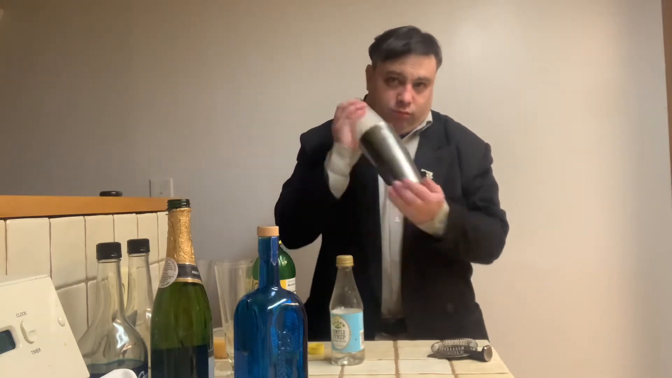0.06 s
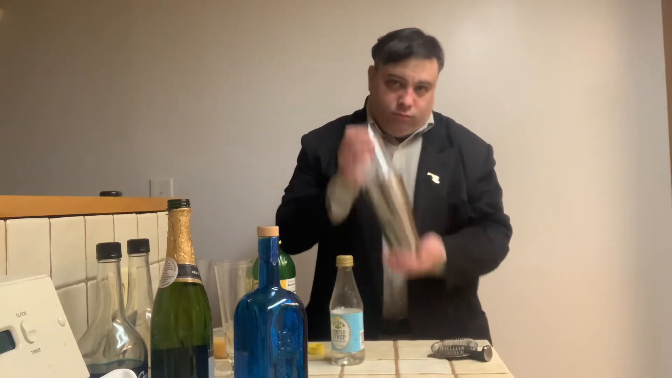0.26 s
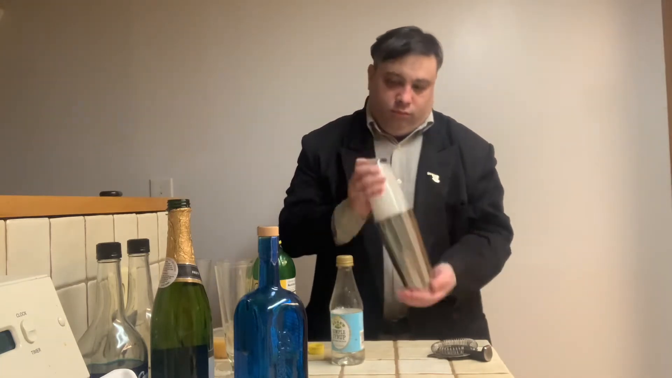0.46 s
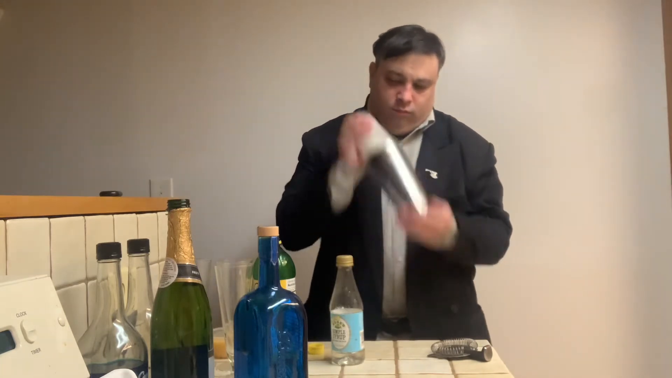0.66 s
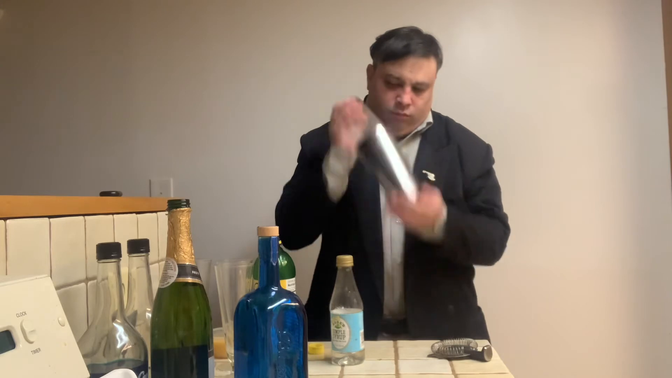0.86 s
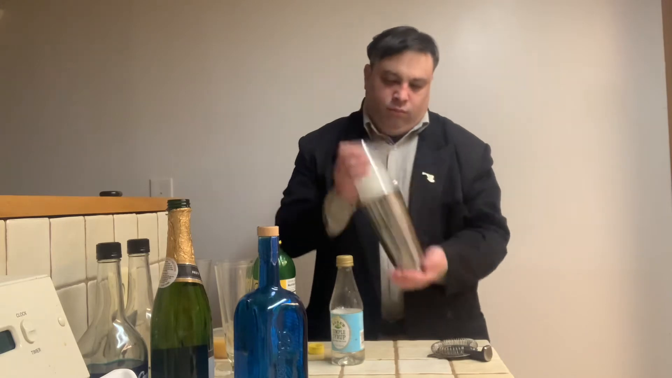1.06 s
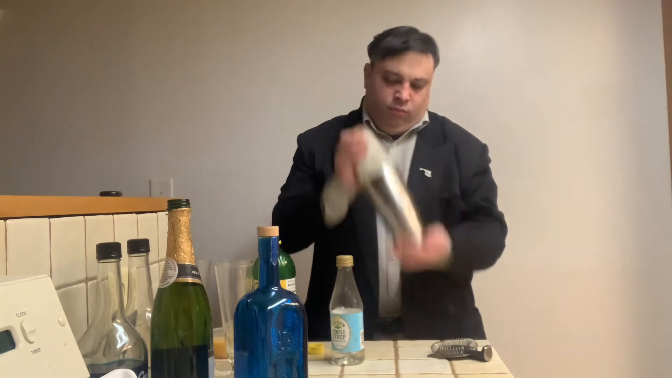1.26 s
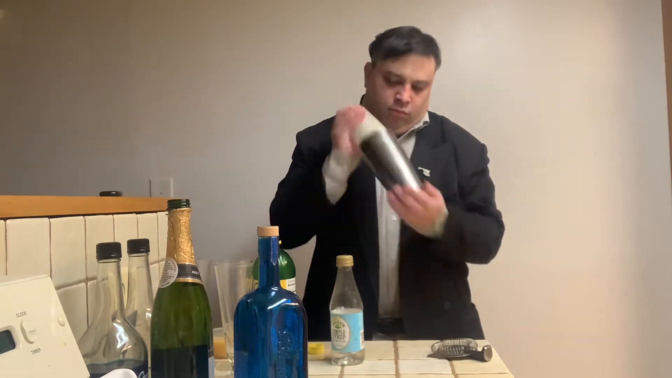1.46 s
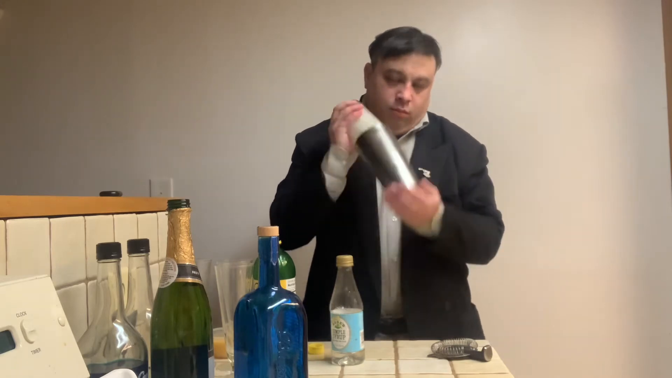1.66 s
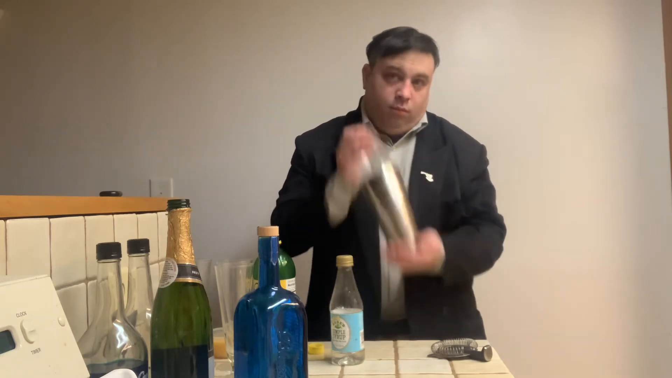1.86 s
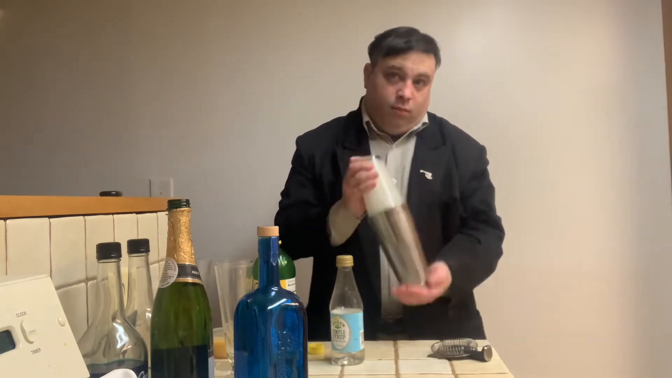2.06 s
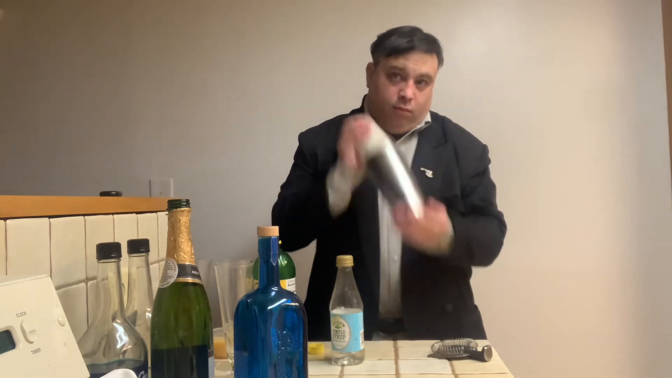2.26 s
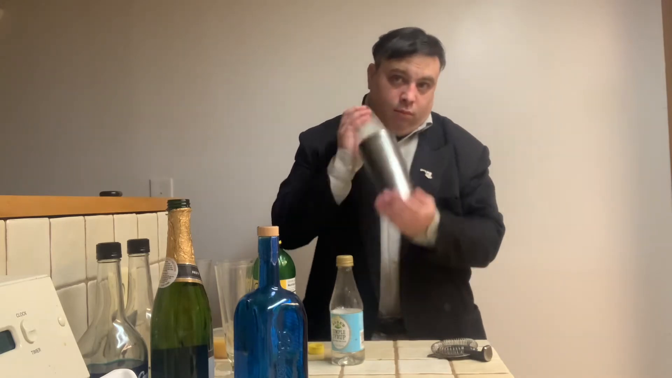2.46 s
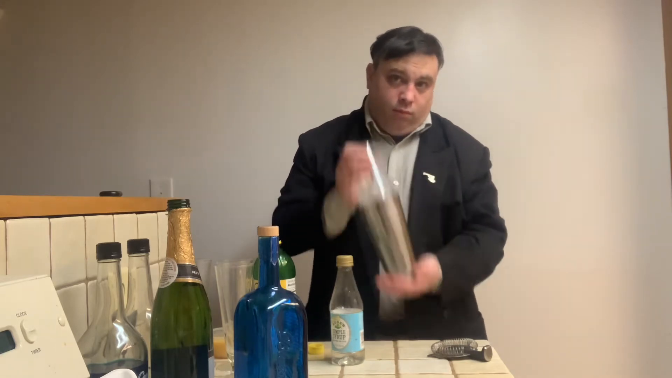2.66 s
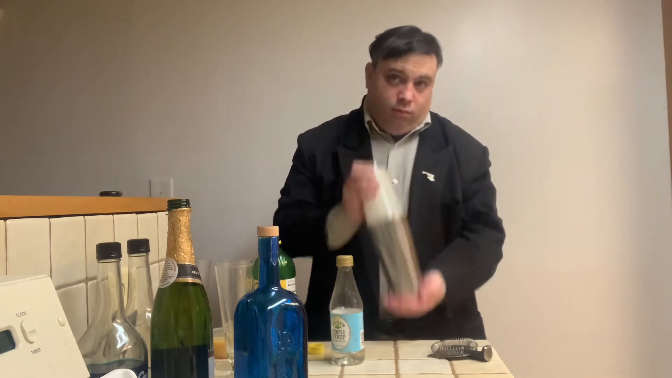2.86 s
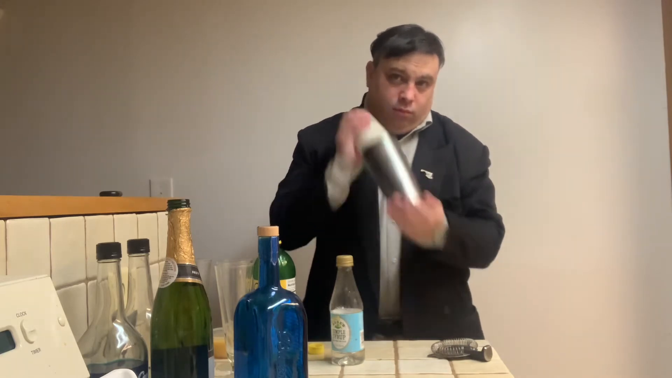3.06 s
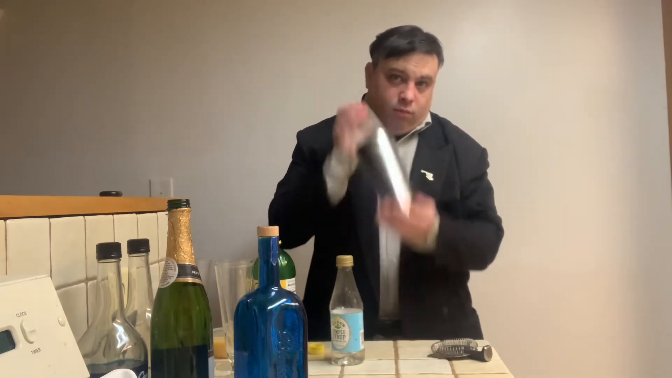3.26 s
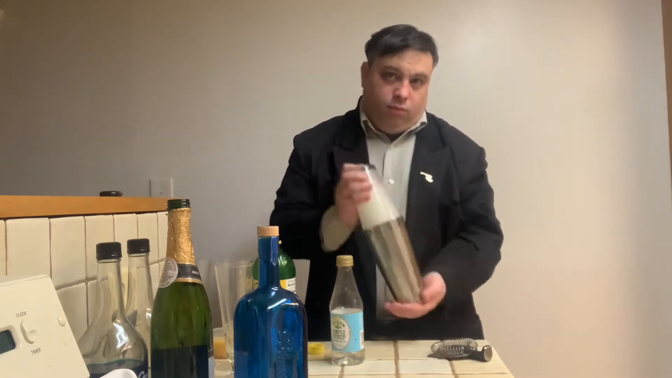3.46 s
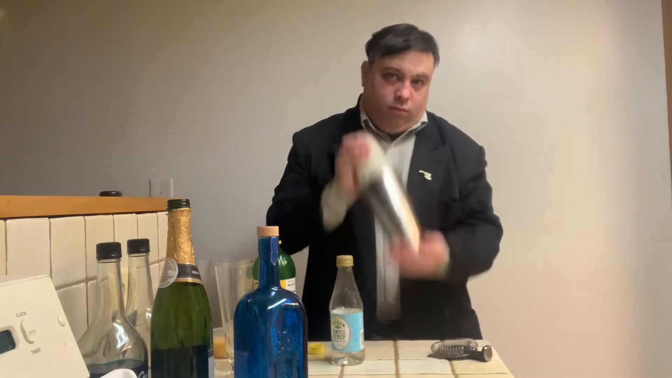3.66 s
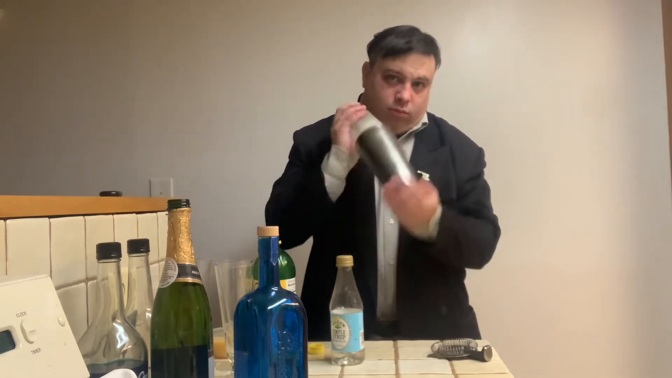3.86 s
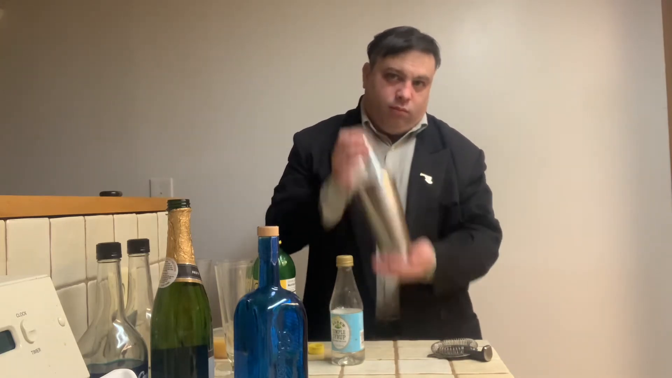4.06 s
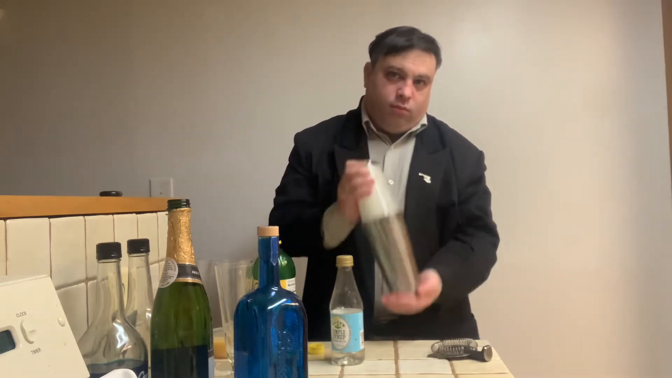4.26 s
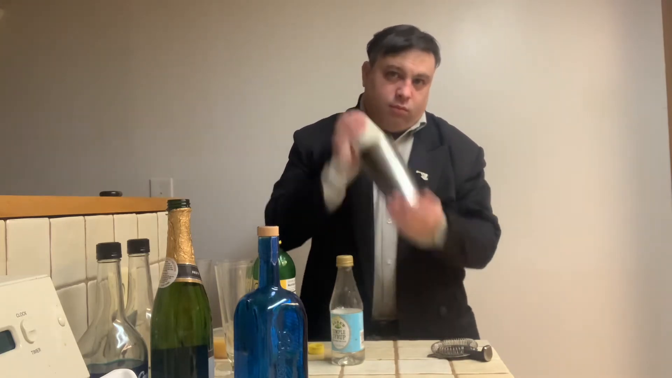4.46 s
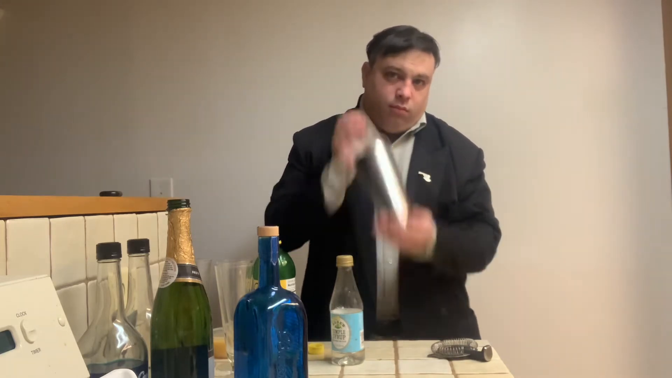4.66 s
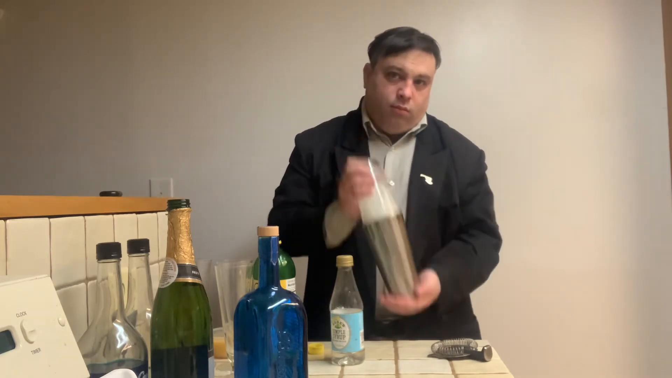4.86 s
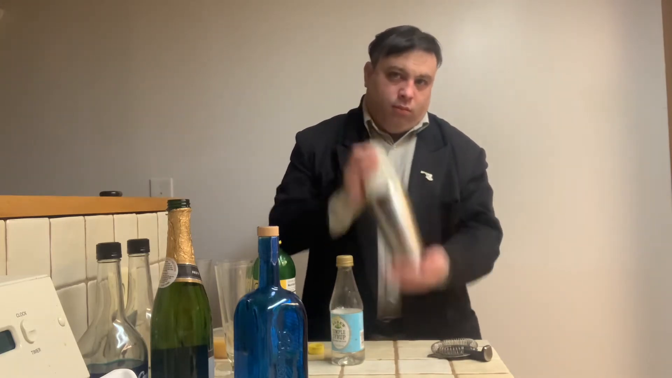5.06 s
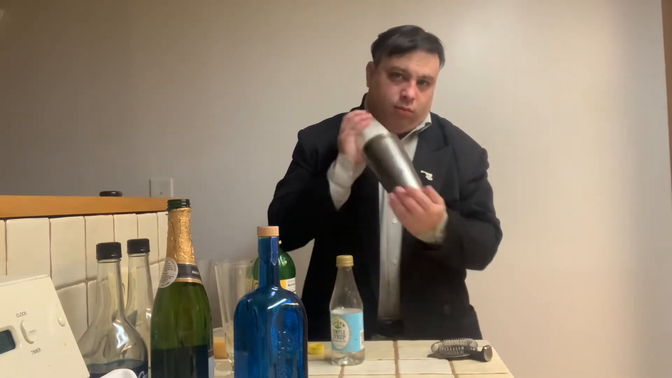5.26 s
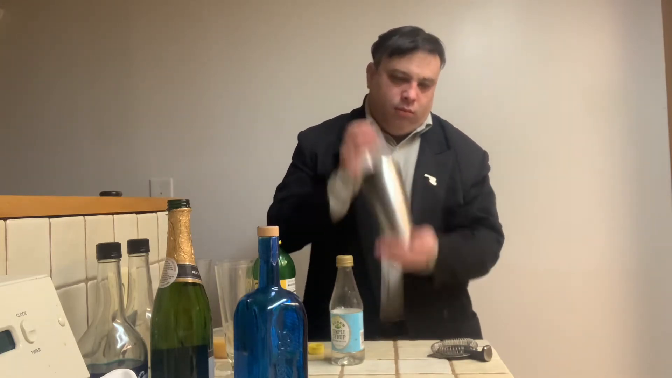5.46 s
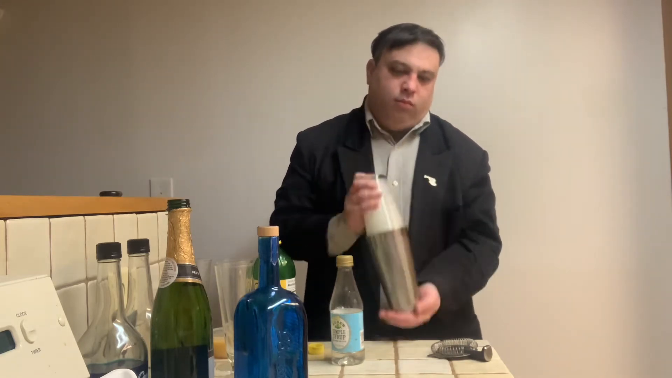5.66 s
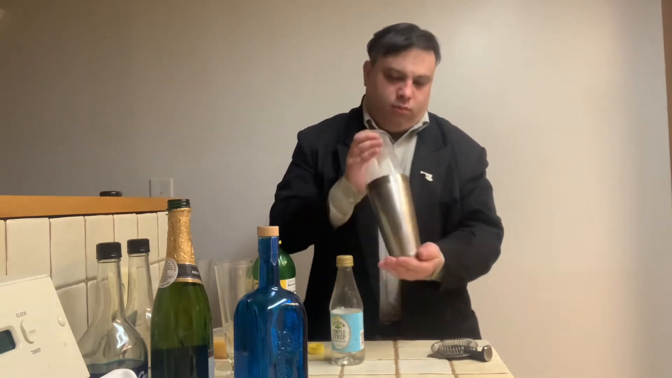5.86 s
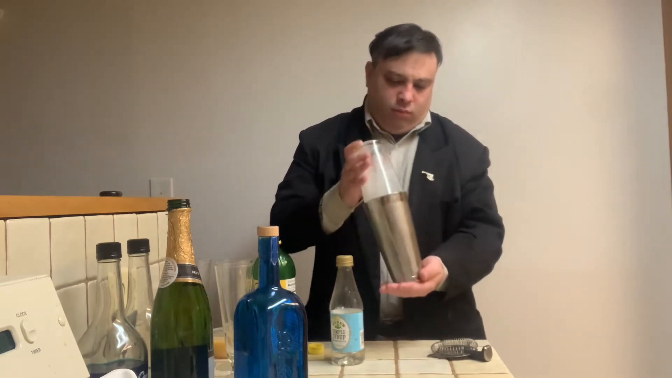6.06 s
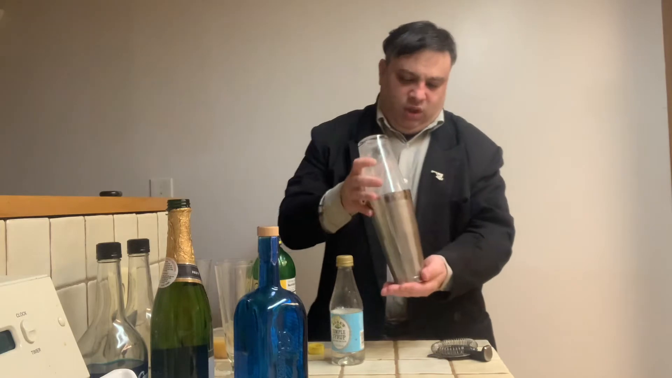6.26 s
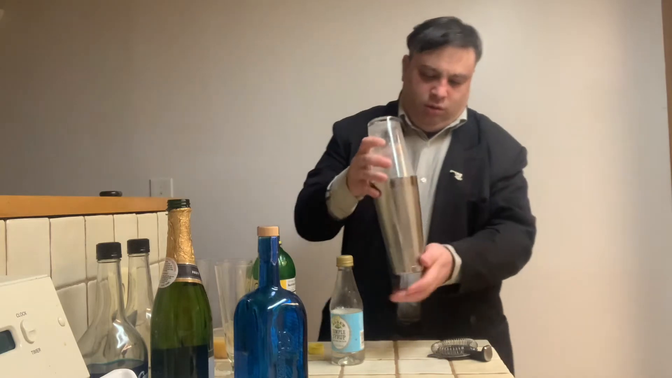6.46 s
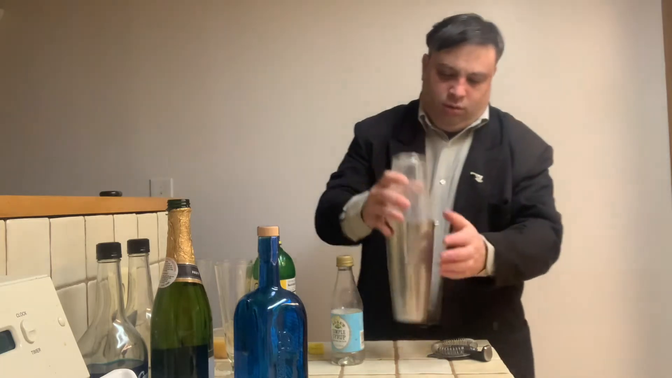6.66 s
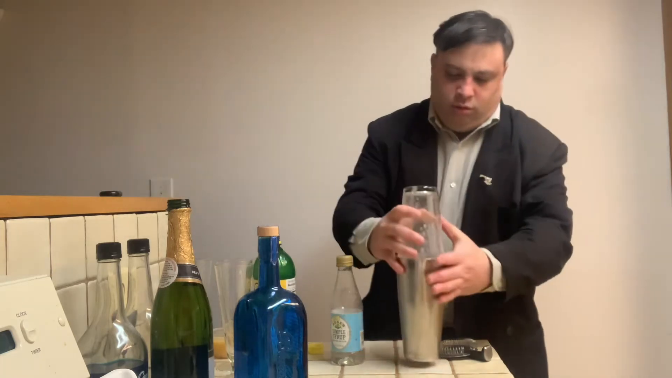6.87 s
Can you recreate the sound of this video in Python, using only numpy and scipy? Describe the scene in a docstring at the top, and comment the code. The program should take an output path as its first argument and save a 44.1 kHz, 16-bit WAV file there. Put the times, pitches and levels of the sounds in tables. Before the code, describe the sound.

In a small kitchen with a faint fridge hum, ice and liquid are shaken vigorously in a metal tin, seven or eight strokes a second, each a crisp, clanking, slushy crash. Near six seconds the shaking stops, a few softer clinks settle, near quiet follows, and the tin is set down with a short knock. The microphone is fairly close, with short room reflections.

```python
"""A kitchen with a humming fridge, where ice and liquid rattle in a hand-swung steel shaker tin.
Seven or eight strokes a second throw the load at the ends; the ice then settles and the tin meets the counter.
Random contacts and single blows excite decaying sine modes of wall and ends, with filtered noise for cracks.
The fridge is wavering sines over shaped noise. Sparse random echoes and a stereo spread by frequency give width."""
import sys
import numpy as np
from scipy import signal
from scipy.fft import rfft, irfft, next_fast_len
from scipy.io import wavfile

SR = 44100
rng = np.random.default_rng(int(sys.argv[2]) if len(sys.argv) > 2 else 0)


def generate_wav(sig):
    """Save sig (samples, or channels by samples) to the path in sys.argv[1] as 16-bit PCM at SR."""
    pcm = np.round(np.clip(np.atleast_2d(sig).T, -1, 1) * 32767).astype(np.int16)
    wavfile.write(sys.argv[1], SR, pcm)


N = 304727

# Fridge tones. Each row: frequency in Hz, level in dB before waver and panning.
FRIDGE_TONES = [(59.2, -47.5), (119, -68), (146, -76), (194, -74), (243, -73), (291.5, -67), (388, -76)]
# Colour of the kitchen background. Each row: frequency in Hz, relative density in dB per Hz.
AIR_COLOUR = [(15, -37.5), (30, -27), (45, -6), (69, -9), (150, -22), (286, -16.5), (500, -22),
              (811, -28.5), (1670, -31), (2020, -34.5), (3300, -38), (6200, -44), (8320, -52), (9270, -81),
              (11200, -57.5), (15000, -69)]
AIR_DB = -55.5  # rms before panning
# Likeness of the background in the two channels. Each row: frequency in Hz, correlation from -1 to 1.
AIR_LIKENESS = [(60, 0.75), (180, 0.068), (550, -0.71), (1650, 0.22), (4970, 0.51), (15000, -0.023)]

# Kitchen echoes. Each row: frequency in Hz, 60 dB decay time in seconds, level in dB against the direct sound.
ECHOES = [(250, .18, -2), (1000, .16, 1), (3000, .14, 2.5), (7000, .12, 2.5), (8200, .1, -9),
          (10500, .1, -7), (16000, .1, -4)]
ECHO_GAP = 320  # samples before the first echo
# Stereo phase and level set by frequency, left against right, for the shaker's direct sound.
# Each row: frequency in Hz, phase in radians, level in dB.
STEREO_SPREAD = [(60, 0, 3), (450, -.7, 2), (800, -1.8, -2.5), (1500, -.55, 0), (2500, -1.6, 0),
                 (5250, -3, 1.5), (6800, -4.5, .1), (8200, -3.14, 0), (10200, -3.14, 0), (11500, -6.28, 0),
                 (16500, -6.28, 0)]
EDGE_HZ = 15800  # top of the recorded band

# The base bumps down. Each row: start in seconds, peak level in dB before panning.
BUMPS = [(6.896, -43), (6.901, -31), (6.9045, -23.5), (6.9075, -20.5)]
# Counter modes. Each row: frequency in Hz, relative level in dB, 60 dB decay time in seconds.
COUNTER_MODES = [(805, 5, 0.068), (876, -11, 0.046), (1290, 3, 0.086), (1520, -10, 0.03), (2000, -8, 0.031),
                 (300, 1, 0.061), (2580, -8, 0.022), (3560, -19, .01), (5400, -15, 0.016)]

# Wall modes of the filled tin. Each row: frequency in Hz, relative level in dB,
# 60 dB decay time in seconds before damping.
WALL_MODES = [(1080, -9.5, 0.059), (1347, -4, 0.042), (1478, -4.5, 0.058), (1566, 0, 0.034),
              (1668.4, 1, 0.06), (1727, -1, 0.05), (1908, -18.5, 0.08), (2323, -1, 0.067),
              (2427, -6.5, 0.071), (2590, -5.5, 0.07), (2876, 4, 0.04), (3030, -4, 0.017),
              (3286, -8.5, 0.06), (4710, -0.5, 0.034)]
# Low modes of the tin's ends and the air inside. Each row: frequency in Hz, relative level in dB,
# 60 dB decay time in seconds before damping.
END_MODES = [(239.4, -7, 0.07), (426, -18, 0.077), (461.6, -8, 0.096), (598, -10.5, 0.063),
             (644, -2.5, 0.035), (752, 6.5, 0.021), (880, 3, 0.014)]
# Colour of an ice contact. Each row: frequency in Hz, relative gain in dB.
CONTACT_COLOUR = [(150, -37), (900, -17), (1500, -3.5), (3000, 0), (4000, -3), (5500, 2.5), (7000, -1),
                  (8500, -5.5), (10200, -13), (12000, -13.5), (15500, -16.5)]
# After the shaking the liquid drains off the wall: blows ring longer and the steady wall is louder.
REST_S, REST_RING, REST_DB = 5.83, 1.5, 5.5  # seconds, factor, dB

# Strokes throw the load at one end. Each row: peak time in seconds, rattle drive in dB, thud drive in dB.
STROKE_SWELLS = [(0.015, -26, -42), (0.165, -26.5, -37), (0.319, -35, -45), (0.474, -28.5, -41),
                 (0.564, -43, -49), (0.728, -29, -41), (0.888, -54, -61), (1.013, -27, -38),
                 (1.157, -28, -42), (1.287, -24.5, -38.5), (1.397, -26, -42.5), (1.541, -25.5, -36),
                 (1.686, -36, -61), (1.821, -39, -40.5), (1.961, -32, -41.5), (2.09, -27.5, -41.5),
                 (2.235, -42, -44), (2.365, -26.5, -39), (2.499, -33, -46), (2.629, -29, -39.5),
                 (2.764, -27, -46), (2.903, -29, -50), (3.028, -34.5, -42), (3.168, -25, -38.5),
                 (3.352, -31.5, -49), (3.452, -24.5, -35), (3.612, -35, -60), (3.751, -28, -39),
                 (3.876, -27.5, -39), (4.021, -28, -37), (4.156, -61, -41.5), (4.31, -34, -39),
                 (4.46, -49, -51), (4.58, -24.5, -34.5), (4.709, -29, -47), (4.849, -25.5, -36),
                 (4.979, -43, -42), (5.113, -36, -40.5), (5.228, -28, -43), (5.383, -26, -36.5),
                 (5.527, -26, -42), (5.662, -29, -44), (5.74, -50, -47)]
# Loose ice between strokes, then settling. Each row: time in seconds, rattle drive in dB, thud drive in dB.
LOOSE_ICE = [(0, -36, -56), (1, -32, -44.5), (2, -29.5, -54), (3, -32.5, -45), (4, -29, -50),
             (5, -28.5, -45.5), (5.79, -35.5, -54), (5.85, -47, -61), (5.95, -46, -65), (6.15, -43, -53),
             (6.22, -48, -74), (6.34, -52.5, -62.5), (6.4, -64, -76), (6.55, -67, -81), (6.64, -68, -78),
             (6.78, -66.5, -80)]
SWELL_ROUND = 1.88  # 1 = pointed swell, 2 = bell
RISE_S, FALL_S = 0.068, 0.065  # the rattle changes by a factor e in these times
THUD_RISE_S, THUD_FALL_S = 0.036, 0.056  # the same for the thud
# Before a heavy thud the load is in flight and the loose ice hushes.
FLIGHT_S, FLIGHT_WIDTH_S = 0.069, 0.0097
HUSH_FROM_DB, HUSH_PER_DB = -42, 5  # thud drive where hushing begins, dB of hush per dB above it
SHARP_DB, SHARP_LEAD_S = -4.5, 0.0026  # the brightest contacts swell a little before the wall rings

# Single large ice blows. Each row: start in seconds, level in dB, strongest ring in Hz, thud in Hz,
# thud in dB against the blow, bright tick in dB against the blow, all levels before the layer trims.
ICE_BLOWS = [(0.001, -18, 1710, 800, -14, -16), (0.02, -24, 2680, 360, -18, -15),
             (0.1265, -22, 1680, 368, -19, -18), (0.1523, -16.5, 1440, 1060, -9, -19),
             (0.169, -21.5, 1770, 430, -14, -17), (0.2607, -21, 1800, 860, -35, 1),
             (0.274, -18.5, 1720, 820, -32, -15), (0.3092, -18, 1620, 437, -22.5, -21),
             (0.337, -22, 2800, 856, -34, -19), (0.414, -28, 1710, 713, -30, -19),
             (0.4226, -19.5, 1660, 713, -34, -19), (0.4496, -17.5, 1450, 704, -13, 0),
             (0.4778, -19, 2280, 627, -21, -23), (0.546, -23, 2840, 730, -26, -15),
             (0.5555, -14.5, 2805, 830, -42, -12), (0.5975, -17.5, 2760, 790, -23, -24),
             (0.6659, -21, 1680, 390, -40, -25), (0.6893, -18.5, 1700, 724, -39, -19),
             (0.7213, -19.5, 1840, 740, -11.5, -5), (0.744, -16.5, 1770, 663, -19, -15),
             (0.8106, -22.5, 1570, 880, -13, -14), (0.846, -26, 1650, 760, -18, 9),
             (0.8627, -15, 2830, 660, -29, -14), (0.8818, -19, 1523, 710, -28, -30),
             (0.9313, -18.5, 1710, 476, -34, -21), (0.9537, -22.5, 1630, 775, -38, -8),
             (0.966, -23.5, 1730, 445, -24, -15), (0.9986, -16.5, 2760, 700, -38, -13),
             (1.016, -20, 1730, 975, -9, -3), (1.091, -21, 2900, 850, -18, -17),
             (1.147, -17.5, 1784, 694, -17, -18), (1.188, -22, 2880, 690, -31, -17),
             (1.2167, -17.5, 1580, 549, -39, -25), (1.2756, -22.5, 2270, 463, -5, -19),
             (1.358, -20, 1610, 750, -12, -17), (1.3902, -18, 1530, 850, -34, -22),
             (1.5165, -22, 1570, 915, -13, -19), (1.5309, -12, 1450, 710, -16.5, -22),
             (1.54, -26, 2310, 670, -15, -17), (1.5944, -20.5, 1644, 720, -32, -17),
             (1.6337, -23.5, 1570, 730, -10, 8), (1.6734, -17.5, 1600, 660, -17, -17),
             (1.6892, -22.5, 1710, 797, -17, -9), (1.702, -31, 1630, 740, -12, -17),
             (1.7515, -17.5, 1660, 610, -32, -29), (1.779, -20, 1430, 450, -16, -15),
             (1.7958, -20, 1710, 544, -20, -22), (1.8224, -14, 1766, 716, -27, -22),
             (1.8994, -23, 1745, 825, -13, -3), (1.9233, -27, 1640, 806, -13, 9),
             (1.9435, -18, 1820, 710, -25, -8), (2.0555, -19.5, 1570, 720, -11.5, -5),
             (2.0874, -15, 2410, 446, -18.5, -14), (2.166, -17, 1655, 800, -27, -34),
             (2.1996, -16.5, 2990, 610, -17.5, -4), (2.2321, -15, 3030, 760, -31, -27),
             (2.3074, -22, 1310, 436, -32, -21), (2.3267, -25, 1780, 430, -14, -18),
             (2.3523, -13.5, 1770, 654, -15.5, -32), (2.4095, -32.5, 1540, 724, -19, 17.5),
             (2.457, -21.5, 1570, 786, -21, -2), (2.4658, -26.5, 1530, 716, -10, 15),
             (2.4918, -20.5, 1665, 670, -29, -6.5), (2.499, -15, 1620, 444, -35, -17.5),
             (2.6115, -12.5, 2460, 680, -20, -9), (2.63, -19, 2300, 393, -13, -19),
             (2.7432, -39, 1570, 738, -32, 18), (2.7562, -14, 2630, 448, -34, 5),
             (2.7605, -20, 2330, 700, -30, 3), (2.8524, -21, 1385, 455, -32, -16),
             (2.884, -19, 1660, 443, -14, -13), (2.8945, -16.5, 1596, 440, -7.5, -14),
             (2.927, -25, 1600, 633, -10, -15), (3.0055, -23, 1530, 600, -33, 1),
             (3.016, -19, 1720, 720, -41, -8), (3.1472, -23.5, 1450, 704, -6, -21),
             (3.1752, -18, 1700, 440, -20, -10), (3.193, -28.5, 1650, 497, -6.5, -15),
             (3.318, -21, 1784, 410, -16.5, -15), (3.351, -16, 2990, 700, -34, -20),
             (3.4371, -16.5, 2620, 990, -9.5, -8), (3.5468, -21, 1650, 710, -19, -2),
             (3.6091, -19, 1660, 490, -19, -27), (3.6411, -26, 1680, 501, -37, -22),
             (3.7109, -14.5, 2560, 434, -28, -21), (3.7349, -18, 1630, 720, -11, -17),
             (3.757, -22.5, 1770, 740, -11, -20), (3.8735, -18.5, 1830, 477, -18, -17),
             (3.9707, -15.5, 2470, 644, -17, -21), (4.0093, -14, 1733, 490, -23, -23),
             (4.1405, -18.5, 1900, 734, -22, -8), (4.181, -25, 2780, 704, -26, -15),
             (4.3018, -15, 1775, 443, -14, -19), (4.4014, -21.5, 1830, 516, -14.5, -1),
             (4.42, -25.5, 1800, 734, -9, -15), (4.45, -19.5, 1750, 458, -34, -24),
             (4.517, -20.5, 1510, 425, -26, -10), (4.537, -26.5, 1370, 654, -1, 7),
             (4.5604, -13, 1400, 586, -19.5, -2), (4.6823, -32, 1670, 824, -19, -11),
             (4.6989, -11.5, 1570, 830, -29, -7), (4.714, -22, 1576, 890, -15, -15),
             (4.769, -20.5, 1620, 610, -33, -19), (4.8474, -16.5, 2300, 710, -31, -23),
             (4.8948, -23, 2700, 730, -13, 1), (4.9591, -17.5, 1540, 750, -24, -27),
             (5.0745, -23, 1760, 431, -24, -15), (5.087, -39, 1726, 510, -23, -15),
             (5.0968, -14, 1530, 930, -19, -1), (5.1137, -19.5, 1740, 463, -10.5, -3),
             (5.135, -16.5, 2850, 890, -14, -20), (5.1757, -17.5, 1550, 690, -20, -32),
             (5.216, -15.5, 2900, 460, -17, -19), (5.2345, -37, 2870, 700, -19, -20),
             (5.2565, -17, 1740, 802, -29, -28), (5.2692, -19, 1710, 685, -24, -14),
             (5.34, -23, 1610, 462, -23, -20), (5.351, -33, 1580, 590, -29, -15),
             (5.3671, -16, 1500, 600, -22, -2), (5.388, -18.5, 1726, 685, -10.5, -8),
             (5.5014, -27, 1700, 765, -23, -16), (5.5173, -18.5, 1800, 460, -34, -18),
             (5.653, -16, 1604, 900, -15.5, -4), (5.661, -24, 2180, 435, -29, -12),
             (5.72, -20, 1570, 480, -11.5, -8), (5.7793, -29.5, 1830, 634, -13, -5),
             (5.8696, -34, 1620, 732, -24, -26), (5.9225, -31.5, 3370, 413, -30, -10),
             (5.944, -46, 1660, 420, -4, -20), (5.9814, -32.5, 1650, 430, -31, -15),
             (5.994, -45, 1610, 420, 2.5, -20), (6.0472, -30, 1650, 611, -31, -3),
             (6.0909, -29.5, 1580, 422, -8.5, -21), (6.1524, -30, 2340, 380, -14, -9),
             (6.334, -40.5, 2385, 417, -7, -2), (6.473, -50, 1730, 980, -12, -20),
             (6.564, -50.5, 1334, 750, -3, -13), (6.574, -50, 1660, 760, -10, -6),
             (6.701, -56, 1510, 700, -10, -10), (6.7336, -48, 1270, 444, -7, -20),
             (6.875, -52, 3320, 710, -18, -15)]


def gain_of(db):
    """Turns decibels into an amplitude factor."""
    return 10 ** (np.asarray(db) / 20)


def evened(x):
    """Scales to rms 1."""
    return x / np.sqrt(np.mean(x ** 2) + 1e-20)


def read(points, hz, axis=1):
    """Reads one column of a table, interpolated over log frequency."""
    columns = np.transpose(points)
    return np.interp(np.log(hz + 1), np.log(columns[0] + 1), columns[axis])


def add(mix, s, sound):
    """Mixes a sound in at a time in seconds, cut at the end of the mix."""
    part = mix[round(s * SR):][:len(sound)]
    part += sound[:len(part)]


def high(x, hz):
    """Removes what lies below a frequency."""
    return signal.sosfilt(signal.butter(4, hz, "high", fs=SR, output="sos"), x)


def coloured(x, points):
    """Shapes the spectrum causally, with a minimum-phase filter of unit energy made from the log gain."""
    hz = abs(np.fft.fftfreq(4096, 1 / SR))
    log_gain = np.log(gain_of(read(points, hz)))
    spectrum = np.exp(np.conj(signal.hilbert(log_gain)))
    taps = np.fft.ifft(spectrum).real[:2048]
    return signal.oaconvolve(x, taps / np.linalg.norm(taps))[:len(x)]


def background_air():
    """Low kitchen noise: shaped random spectra, partly shared between the channels."""
    hz = np.fft.rfftfreq(2048, 1 / SR)
    a, b, c, d = rng.standard_normal((N // 512 + 5, 1025, 4)).T
    left, other = a + 1j * b, c + 1j * d
    same = np.clip(read(AIR_LIKENESS, hz), -1, 1)[:, None]
    right = same * left + np.sqrt(1 - same ** 2) * other
    spectra = np.array([left, right]) * gain_of(read(AIR_COLOUR, hz))[:, None]
    air = signal.istft(spectra, nperseg=2048, noverlap=1536)[1][:, :N]
    return gain_of(AIR_DB) * evened(air)


def fridge():
    """Steady motor tones whose common level wavers a little, over the kitchen noise, louder on the left."""
    t = np.arange(N) / SR
    waver_hz = np.geomspace(2, 14, 12)
    waver = evened(sum(np.sin(2 * np.pi * (hz * t + rng.random())) for hz in waver_hz))
    tones = np.zeros(N)
    for hz, db in FRIDGE_TONES:
        tones += np.sqrt(2) * gain_of(db) * np.sin(2 * np.pi * (hz * t + rng.random()))
    hum = tones * gain_of(0.74 * waver)  # waver in dB
    return (hum + background_air()) * gain_of([[1.6], [-1.9]])


def echo_tails(count):
    """Sparse echoes of random sign whose decay and level depend on frequency."""
    length, spacing = SR // 5, 20  # samples
    taps = np.zeros((count, length))
    at = np.arange(ECHO_GAP, length - spacing, spacing)
    at = at + rng.integers(0, spacing, (count, len(at)))
    np.put_along_axis(taps, at, rng.choice([-1., 1.], at.shape), 1)
    hz, t, spectra = signal.stft(taps / np.sqrt(SR / spacing), SR, nperseg=256)
    t60 = read(ECHOES, hz)[:, None]
    db = read(ECHOES, hz, axis=2)[:, None]
    decay = gain_of(db - 60 * t / t60)
    decay = decay / np.sqrt(t60 / (2 * np.log(1000)))  # the decay time leaves the energy alone
    return signal.istft(spectra * decay, SR, nperseg=256)[1]


def kitchen(x, size=6000):
    """Reflections differ in each channel and, as the tin moves, cross-fade to new ones every size samples."""
    starts = np.arange(-size, N, size)
    tails = echo_tails(2 * len(starts))
    padded = np.pad(x, (size, 2 * size))
    out = np.zeros((2, N + size))
    fade = np.sin(np.pi * np.arange(2 * size) / (2 * size))
    for k, start in enumerate(starts + size):
        stretch = fade * padded[start:start + 2 * size]
        for side in (0, 1):
            add(out[side], start / SR, signal.fftconvolve(stretch, tails[2 * k + side]))
    return out[:, size:]


def spread_direct(x):
    """Spreads direct sound between the channels: half of each phase and level difference goes to either side."""
    size = next_fast_len(N + 4096)
    hz = np.fft.rfftfreq(size, 1 / SR)
    half_gain = gain_of(read(STEREO_SPREAD, hz, axis=2) / 2)
    half = half_gain * np.exp(.5j * read(STEREO_SPREAD, hz))
    return irfft(rfft(x, size) * np.array([half, 1 / half]), size)[:, :N]


def ring(modes, detune, spread_db, damped=1.0, s=0):
    """One blow on a set of modes; the place struck and the moving liquid shift pitches, levels and signs."""
    hz, db, t60 = np.transpose(modes)[:, :, None]
    rest = REST_RING if s > REST_S else 1
    detune, damped = detune / rest, damped * rest
    t = np.arange(round(2600 * damped)) / SR
    shift, place, side = rng.standard_normal((3, len(modes), 1))
    swing = np.sign(side) * np.sin(2 * np.pi * hz * (1 + detune * shift) * t)
    onset = 1 - np.exp(-t * hz / .9)  # wet ice lands softly: each mode needs about a cycle to build
    level = gain_of(db + spread_db * place - 60 * t / (t60 * damped))
    out = (level * swing * onset).sum(0)
    return out / abs(out).max()


def counter():
    """The base touches down in quick bumps that ring the counter, louder on the left."""
    out = np.zeros(N)
    for s, db in BUMPS:
        add(out, s, gain_of(db) * ring(COUNTER_MODES, detune=0.02, spread_db=2.5))
    return out * gain_of([[3], [-4]])


def strokes(peak_db, loose_db, rise, fall):
    """Level of the swarm: one swell per stroke over the loose ice, added as powers."""
    t = np.arange(0, N + 64, 64) / SR
    stroke_s, _, thud_db = np.transpose(STROKE_SWELLS)
    late = t - stroke_s[:, None]
    distance = np.where(late < 0, -late / rise, late / fall)
    swell = gain_of(peak_db)[:, None] * np.exp(-distance ** SWELL_ROUND)
    weight_db = np.maximum(thud_db - HUSH_FROM_DB, 0)[:, None]
    flight = np.exp(-((late + FLIGHT_S) / FLIGHT_WIDTH_S) ** 2)
    hush_db = HUSH_PER_DB * (weight_db * flight).sum(0)
    loose = gain_of(np.interp(t, np.transpose(LOOSE_ICE)[0], loose_db) - hush_db)
    level = np.sqrt((swell ** 2).sum(0) + loose ** 2)
    return np.interp(np.arange(N) / SR, t, level)


def contacts(per_s, spread_db):
    """Random small collisions of either sign; a few are large."""
    size_db = spread_db * np.minimum(rng.exponential(1, N), 3.5)
    size = gain_of(size_db) * rng.choice([-1., 1.], N)
    return evened(size * (rng.random(N) < per_s / SR))


def rattle_of(hits, modes, detune, spread_db, damped=0.65, size=1800):
    """The ice moves on: every stretch of size samples rings another spot of the tin."""
    out = np.zeros(N)
    for k in range(0, N, size):
        spot = ring(modes, detune, spread_db, damped, s=k / SR)
        add(out, k / SR, signal.oaconvolve(hits[k:k + size], spot / np.linalg.norm(spot)))
    return out


def rattle():
    """The swarm of ice: random contacts ring the wall, thud on the ends and crack."""
    _, rattle_db, thud_db = np.transpose(STROKE_SWELLS)
    _, loose_db, loose_thud_db = np.transpose(LOOSE_ICE)
    level = strokes(rattle_db, loose_db, RISE_S, FALL_S)
    thud = strokes(thud_db, loose_thud_db, THUD_RISE_S, THUD_FALL_S)
    samples = np.arange(N)
    early = np.interp(samples + SHARP_LEAD_S * SR, samples, level) / level

    cubes = level * contacts(300, spread_db=8.0)
    chips = level * contacts(600, spread_db=4.5)
    grains = level * contacts(1800, spread_db=3.0)
    load = thud * contacts(350, spread_db=1.0)
    cubes_db, chips_db, steady_db, ends_db, slush_db = -14, -15.0, -16.5, -5.0, -5.5

    wall = gain_of(cubes_db) * rattle_of(cubes, WALL_MODES, detune=.008, spread_db=4, size=1200)
    wall += gain_of(chips_db) * rattle_of(chips, WALL_MODES, detune=.007, spread_db=3, damped=.95, size=3000)
    # the whole wall keeps its own pitch
    steady = ring(WALL_MODES + [(1680, 7, .11)], detune=0, spread_db=0, damped=1.2)
    steady_gain = gain_of(steady_db + REST_DB * (samples > REST_S * SR))
    wall += steady_gain * signal.oaconvolve(chips, steady / np.linalg.norm(steady))[:N]
    ends = gain_of(ends_db) * rattle_of(load, END_MODES, detune=.07, spread_db=3, damped=.5, size=800)

    slush = coloured(0.24 * cubes + 0.66 * chips + 1.07 * grains, CONTACT_COLOUR)
    sharp = gain_of(SHARP_DB) * early * high(slush, 6130)
    return wall + ends + gain_of(slush_db) * (slush + sharp)


def blows():
    """Each large blow: a noise crack and bright tick, the wall with one mode ahead, a thud of the ends."""
    body, crack, bright = np.zeros(N), np.zeros(N), np.zeros(N)
    t = np.arange(1500) / SR
    ring_db, ends_db, snap_db, tick_db = -0.5, 0.0, -3.0, -1.0  # layer trims
    crack_t60, tick_t60 = .03, .018  # seconds
    gripped = .45  # hands and liquid shorten the ring of a blow by this factor
    for s, db, hz, thud_hz, thud_db, crack_db in ICE_BLOWS:
        lead = ring(WALL_MODES + [(hz, 7, .07)], detune=.01, spread_db=4, damped=gripped, s=s)
        # the cube skids and taps again, 60 to 219 samples later
        second_gain = rng.uniform(-.7, .7)
        second = np.pad(lead, (rng.integers(60, 220), 0))[:len(lead)]
        lead = lead + second_gain * second
        thud = ring(END_MODES + [(thud_hz, 9, .065)], detune=.03, spread_db=3, damped=gripped, s=s)
        noise = rng.standard_normal(len(t)) * np.minimum(t / .001, 1)  # 1 ms rise
        burst = noise * gain_of(db - 60 * t / crack_t60)
        tick = noise * gain_of(db + crack_db + tick_db - 60 * t / tick_t60)
        add(body, s, gain_of(db + ring_db) * lead + gain_of(db + thud_db + ends_db) * thud)
        add(crack, s, gain_of(snap_db) * burst)
        add(bright, s, tick)
    return body + coloured(crack, CONTACT_COLOUR) + high(bright, 3300)


def scene():
    """Shaker, counter and fridge in the kitchen."""
    shaker = high(rattle() + blows(), 180.0)  # the shaker sounds nothing below about 180 Hz
    return spread_direct(shaker) + kitchen(shaker) + counter() + fridge()


def record(dry):
    """Limits the band with a steep linear-phase low-pass."""
    taps = signal.firwin(511, EDGE_HZ, window=("kaiser", 9), fs=SR)
    return signal.oaconvolve(dry, taps[None], "same")


dry = scene()
out = record(dry)
generate_wav(out)
```